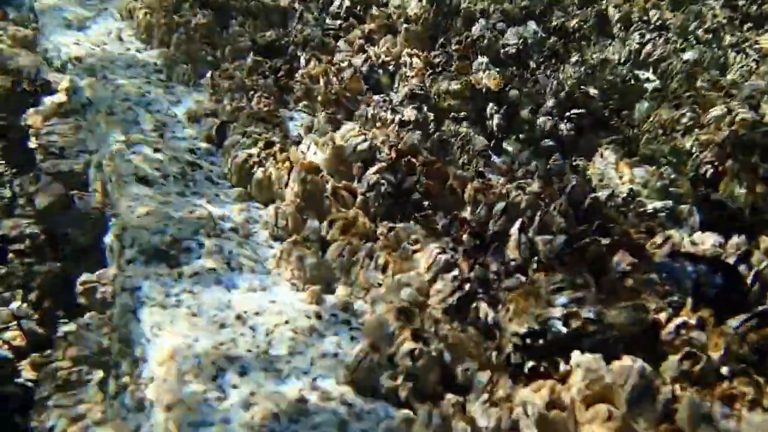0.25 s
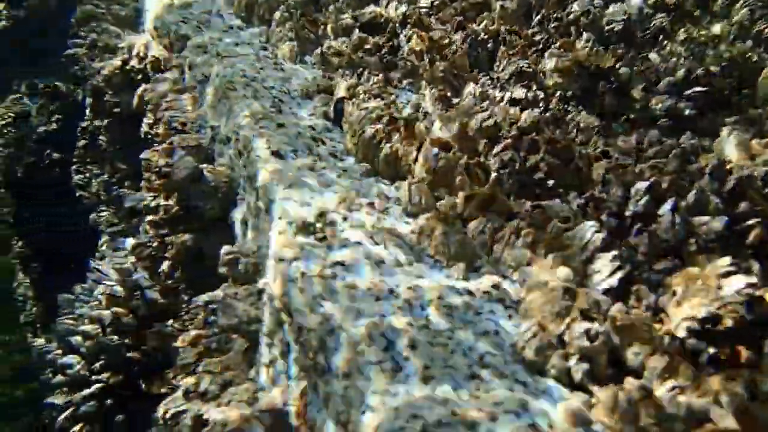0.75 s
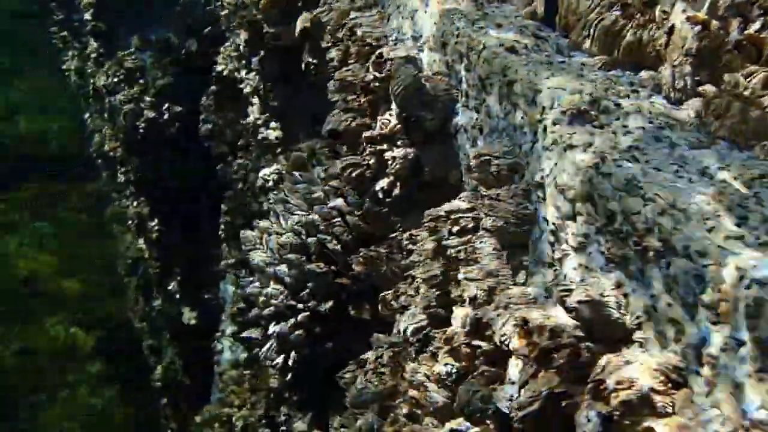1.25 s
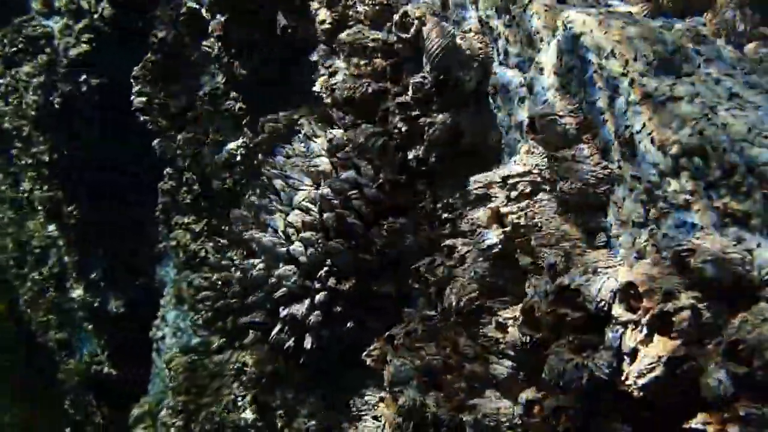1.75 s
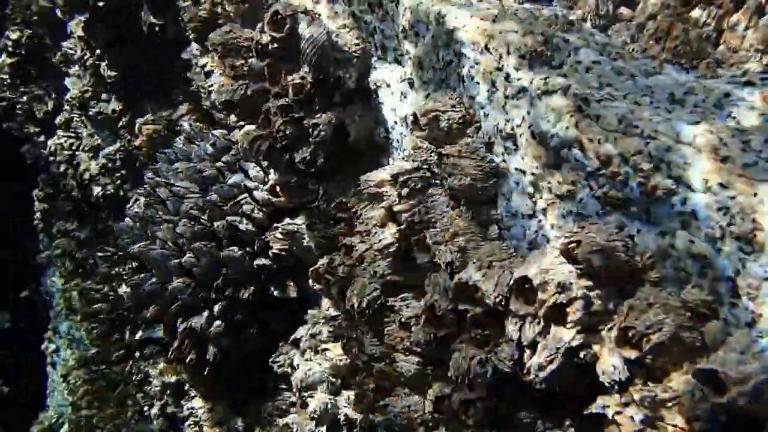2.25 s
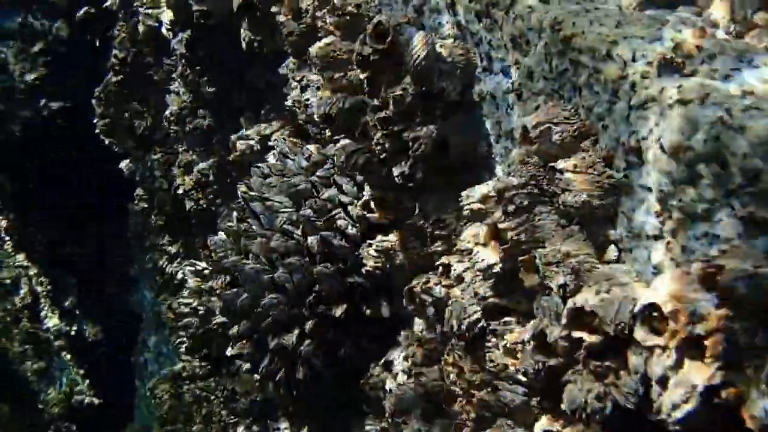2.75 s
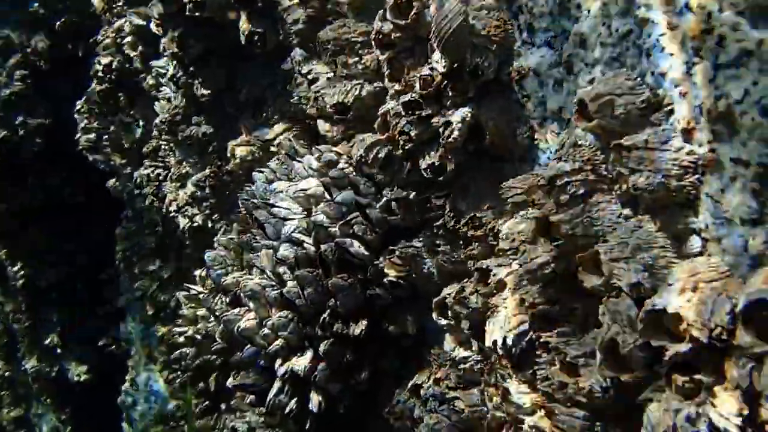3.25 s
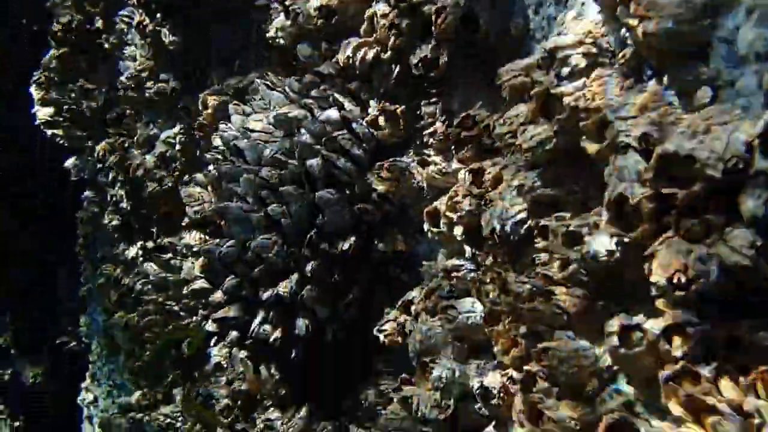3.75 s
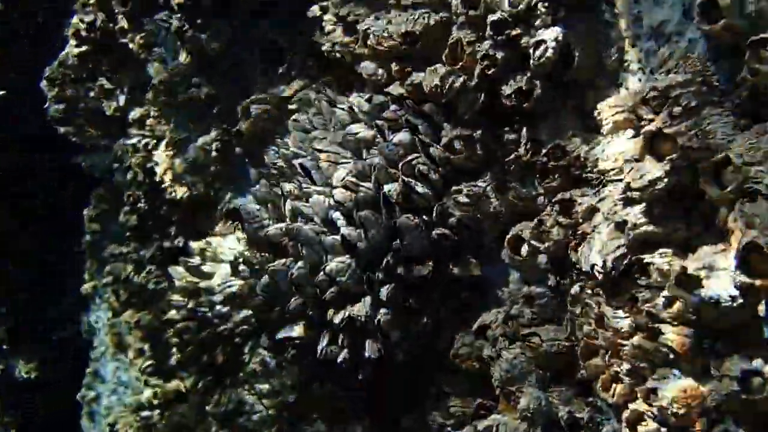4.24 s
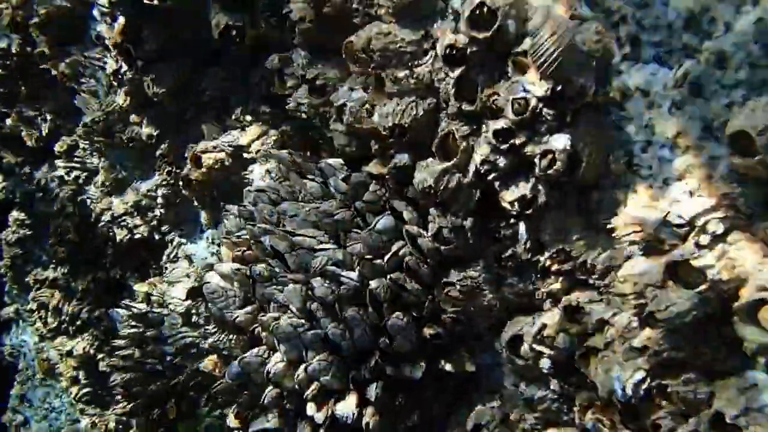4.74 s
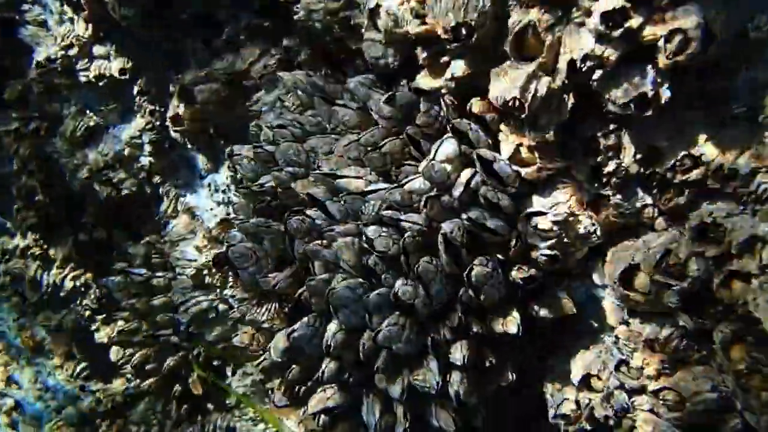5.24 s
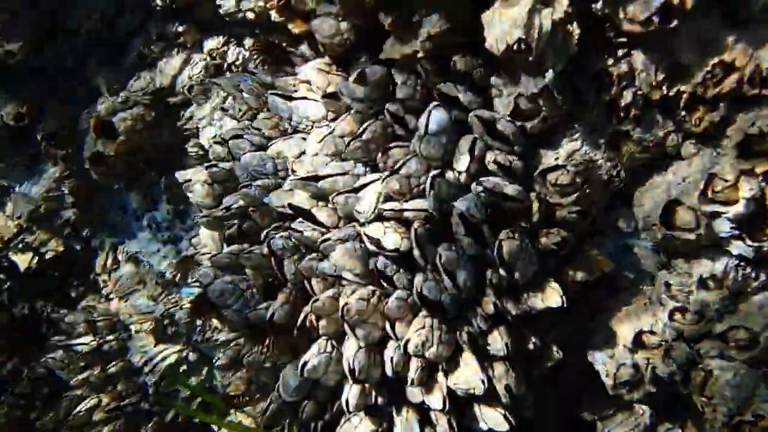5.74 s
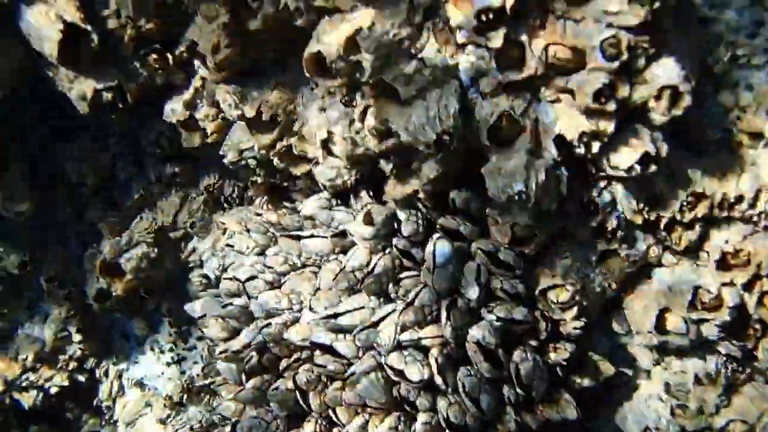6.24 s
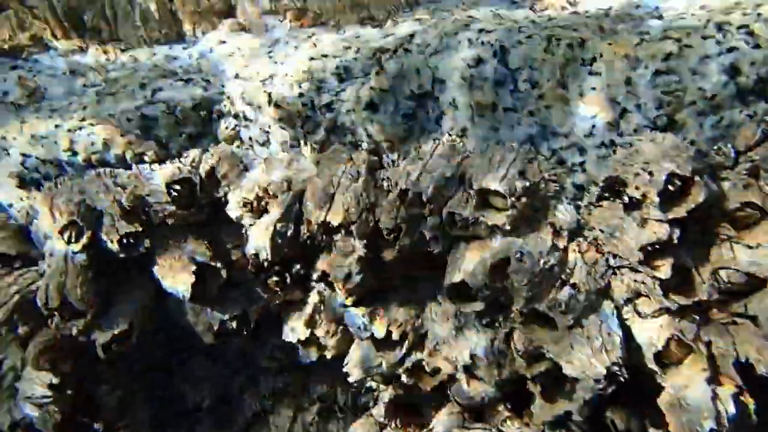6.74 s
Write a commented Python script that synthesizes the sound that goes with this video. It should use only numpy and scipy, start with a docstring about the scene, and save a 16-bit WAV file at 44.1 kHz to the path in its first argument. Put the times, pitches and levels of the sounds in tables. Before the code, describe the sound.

A submerged camera case ticks, pops and rubs softly, bumping hard once and then twice quickly, above steady hiss and low rumble.

```python
"""Under water, close over a barnacle-covered rock, a drifting camera bumps its housing hard three times.
Each impact excites the normal modes of the case; small taps, pops and stick-slip rubs keep it crackling.
Inside, the lens hunts for focus and the iris steps, their clicks dispersed by bending waves in the wall.
Hiss, a faint hum and a dull handling rumble lie beneath; the gain control ducks after each hard bump."""
import sys
import numpy as np
from scipy import signal
from scipy.fft import rfft, irfft, next_fast_len
from scipy.io import wavfile
from scipy.ndimage import map_coordinates

SR = 44100
rng = np.random.default_rng(int(sys.argv[2]) if len(sys.argv) > 2 else 0)


def pcm_store(signal):
    """Save signal as 16-bit PCM."""
    levels = np.round(np.clip(np.atleast_2d(signal), -1, 1) * 32767)
    wavfile.write(sys.argv[1], SR, levels.astype(np.int16).T)


N = 308259
T = np.arange(4096) / SR  # time axis of one click, in seconds
LENS_STEPS_PER_S = 15

# spectral envelopes of the noises and clicks: frequency_hz, relative_db
HISS_SPECTRUM = [(20, -21), (80, -12.5), (200, -6), (1000, -9), (2300, -16.5), (3100, -13.5), (3600, -17),
                 (4400, -17), (5600, -11), (6600, -12.5), (7650, -5), (8450, -9), (9200, -17.5),
                 (16000, -19.5)]
RUMBLE_SPECTRUM = [(20, -31), (60, -11), (180, -0.5), (450, -5), (700, -15), (1180, -4), (1500, -15),
                   (1950, -18.5), (2700, -20.5), (3150, -17.5), (3550, -41), (9000, -26)]
SCRAPE_SPECTRUM = [(60, -12.5), (200, -3), (450, 1.5), (680, -8), (950, 1.5), (1250, 1), (1700, -19.5),
                   (2150, -10.5), (2500, -34), (3050, -6), (4000, -23.5), (12000, -24)]
SQUEAK_SPECTRUM = [(1000, -22), (4000, -19.5), (6600, -14), (7550, 3), (8200, -5), (9300, -29),
                   (11500, -19), (16000, -34)]
IRIS_SPECTRUM = [(100, -30), (480, -2), (850, -2), (1170, 10.5), (1350, 6.5), (1650, -20), (2100, 2),
                 (2400, -21.5), (2950, -1.5), (3550, -12), (4150, -4), (5000, -16), (7500, -26),
                 (12000, -43)]
FOCUS_SPECTRUM = [(200, -11), (750, -34), (1220, 11), (1420, -10), (1560, 4), (1900, -5), (2450, -19),
                  (3080, -19), (3270, 7), (3500, -4.5), (4050, -7.5), (4330, 5), (4600, -5.5), (5200, -8.5),
                  (6300, -10.5), (10000, -41)]
# course of the sinking hum: time_s, pitch_hz, level_db
HUM_GLIDE = [(1.6, 230, -71.5), (2.3, 205, -51.5), (2.8, 185, -80), (4.5, 143.6, -64.5),
             (4.901, 140.6, -56), (5.7, 138.5, -71.5), (6.99, 130.2, -58.5)]
# narrow resonances of the case that sing throughout: pitch_hz, width_hz, level_db
CASE_RESONANCES = [(2265, 90, -68), (3088, 170, -62.5), (3306, 130, -69)]
# strength of the grip that drives the rumble: time_s, relative_db
GRIP_CURVE = [(0.0, -64), (0.29, -63.5), (0.7, -46.5), (0.91, -52), (2.39, -50), (2.59, -52), (3.62, -50.5),
              (4.13, -56.5), (5.49, -48), (6.19, -56.5), (6.83, -57.5), (6.99, -52)]
# spells in which the lens hunts back and forth: start_s, end_s
FOCUS_HUNTS = [(0.02, 0.255), (0.3038, 0.937)]
# steps of the iris: time_s, relative_db
IRIS_STEPS = [(1.28, -31), (1.949, -37.5), (2.35, -37), (2.543, -40), (2.683, -36.5), (2.949, -45.5),
              (3.285, -38), (3.552, -42), (4.224, -36), (4.62, -42.5), (5.09, -38), (5.488, -38),
              (5.824, -40.5), (6.084, -42)]
# soft pushes of the hand: start_s, pitch_hz, peak_db
HAND_PUSHES = [(0.723, 307, -35), (2.268, 198, -41), (3.896, 302, -31.5), (3.906, 228, -35.5),
               (3.988, 192, -34), (6.147, 221, -30)]
# rubs on the case, levels relative: start_s, end_s, scrape_db, squeak_db
CASE_RUBS = [(0.654, 0.713, -48.5, -68), (1.112, 1.168, -51, -68), (1.34, 1.413, -51, -47.5),
             (2.456, 2.512, -44, -45.5), (3.307, 3.442, -48, -57), (3.461, 3.507, -50.5, -46),
             (5.046, 5.105, -54, -46.5), (5.287, 5.365, -50, -53)]
# single slips: start_s, relative_db
SLIP_TICKS = [(1.348, -40), (1.384, -41.5), (4.465, -47.5), (4.815, -47), (5.099, -44), (5.927, -46.5)]
# normal modes of the housing: pitch_hz, relative_db, t60_s
HOUSING_MODES = [(124, -16.5, 0.056), (285, -6, 0.027), (363, -2, 0.025), (485, 1, 0.024), (700, -8, 0.031),
                 (852, 3, 0.023), (1099, 11, 0.026), (1350, -17, 0.037), (2120, -7.5, 0.0099),
                 (2790, -1, 0.011), (3066, -6.5, 0.02), (4260, 0.5, 0.011), (5340, -2, 0.0072),
                 (6040, 2, 0.0049), (7640, 4, 0.0088), (8750, -2, 0.0048), (11020, -16, 0.02)]
# bumps and clear taps, by low, middle and high band: start_s, thump_db, knock_db, crack_db
IMPACTS = [(0.334, -40.5, -44.5, -65), (0.483, -42.5, -49, -65), (0.538, -48, -43, -66),
           (0.58, -42.5, -50, -62), (0.803, -40.5, -55, -68), (0.884, -8.5, -7, -20.5),
           (0.9033, -38, -54, -36.5), (0.965, -33, -37, -48), (1.249, -46, -40, -56),
           (1.509, -42.5, -38, -32.5), (1.612, -10, -6.5, -12.5), (1.636, -15.5, -8, -11.5),
           (1.682, -43, -37, -43), (1.733, -37, -33, -30), (1.979, -43, -49.5, -60),
           (2.141, -42.5, -41.5, -60), (2.255, -39, -43.5, -53), (2.422, -46, -48.5, -60),
           (2.811, -57, -44.5, -68), (2.936, -47.5, -48, -58), (3.461, -62, -40.5, -50.5),
           (3.709, -33.5, -36, -66), (3.743, -42, -45, -68), (4.025, -41.5, -45, -69),
           (4.329, -42.5, -54, -75), (4.589, -42.5, -60, -75), (4.747, -51, -43, -66),
           (5.344, -37, -43, -56), (5.613, -62, -42, -59), (5.814, -60, -42.5, -62),
           (5.911, -47, -43.5, -53), (6.282, -66, -43.5, -66), (6.548, -52, -41, -68),
           (6.636, -42.5, -43.5, -74), (6.882, -59, -46.5, -65)]
# left microphone port relative to the right: frequency_hz, lag_rad, gain_db
PORT_RESPONSE = [(250, .03, -.2), (1000, .25, 2), (2200, .65, 3), (4200, 1.4, .6), (7500, 1.7, -1)]


def amp(db):
    """Decibels to amplitude ratio."""
    return 10 ** (np.asarray(db) / 20)


def unit(x):
    """Normalise to rms 1."""
    return x / np.sqrt(np.mean(x ** 2) + 1e-20)


def unit_click(x):
    """Normalise a transient to the energy of 10 ms at rms 1."""
    return x / np.sqrt(np.sum(x ** 2) / (SR / 100) + 1e-20)


def along(points, hz):
    """Interpolate (frequency_hz, value) points on a logarithmic axis."""
    f, v = np.transpose(points)
    return np.interp(np.log(hz + 1), np.log(f + 1), v)


def filtered(x, response):
    """Linear filtering: multiply the spectrum by a frequency response."""
    size = next_fast_len(N + SR // 2)
    return irfft(rfft(x, size) * response(np.fft.rfftfreq(size, 1 / SR)), size)[..., :N]


def wobble(rate_hz):
    """Slow modulation: a spline through random knots."""
    knots = rng.standard_normal(int(N * rate_hz / SR) + 4)
    return map_coordinates(knots, [np.arange(N) * rate_hz / SR])


def add(track, start_s, sound):
    """Superpose a sound on the track."""
    part = track[max(round(start_s * SR), 0):][:len(sound)]
    part += sound[:len(part)]


def narrowband(hz, width_hz):
    """Quadrature modulation: noise at rms 1 about a centre that may glide."""
    phase = 2 * np.pi * np.cumsum(hz * np.ones(N)) / SR
    return unit(wobble(width_hz) * np.cos(phase) + wobble(width_hz) * np.sin(phase))


def impulse(spectrum, travel_s=0):
    """Dispersion: bending waves carry the treble of a click faster; 1 kHz arrives after travel_s."""
    hz = np.fft.rfftfreq(len(T), 1 / SR)
    cepstrum = irfft(np.log(amp(along(spectrum, hz))))
    minimum_phase = np.exp(rfft(2 * cepstrum * (T < T[-1] / 2)))
    dispersion = np.exp(-4j * np.pi * travel_s * np.sqrt(1000 * hz))
    return unit_click(irfft(minimum_phase * dispersion))


def hiss(level_db=-51):
    """Self-noise: each microphone has its own steady, uncorrelated hiss."""
    white = rng.standard_normal((2, N))
    return amp(level_db) * unit(filtered(white, lambda hz: amp(along(HISS_SPECTRUM, hz))))


def hum(width_hz=30, flutter_db=1.0):
    """Narrowband noise is heard as wavering pitch: a low hum and the thin singing of the case."""
    time_s, pitch_hz, level_db = np.transpose(HUM_GLIDE)
    t = np.arange(N) / SR
    low = amp(np.interp(t, time_s, level_db)) * narrowband(np.interp(t, time_s, pitch_hz), width_hz)
    singing = sum(amp(db + flutter_db * wobble(15)) * narrowband(hz, width)
                  for hz, width, db in CASE_RESONANCES)
    return low + singing


def rumble(gain_db=-2.5, flutter_db=2.5, follow=0.62, crossover_hz=1600):
    """Forced vibration: water and hand stir the resonant case; the low band follows the grip."""
    grip_db = np.interp(np.arange(N) / SR, *np.transpose(GRIP_CURVE))
    stir_db = grip_db.mean() + follow * (grip_db - grip_db.mean())
    noise = unit(filtered(rng.standard_normal(N), lambda hz: amp(along(RUMBLE_SPECTRUM, hz))))
    low = filtered(noise, lambda hz: 1 / (1 + (hz / crossover_hz) ** 4))
    return amp(stir_db + gain_db + flutter_db * wobble(9.1)) * low + amp(-51) * (noise - low)


def focus_motor(pitch_hz=4810, level_db=-58.5, run_s=0.027, settled_s=1.343, mean_skipped_beats=1.4):
    """Tone bursts: once focus has settled, the motor whines on random beats of the lens clock."""
    out = np.zeros(N)
    n = round(run_s * SR)
    whine = unit(np.sin(2 * np.pi * pitch_hz * np.arange(n) / SR) * signal.windows.tukey(n, .3))
    waits = 1 + rng.poisson(mean_skipped_beats, size=50)
    for beat in np.cumsum(waits) - waits[0]:
        add(out, settled_s + beat / LENS_STEPS_PER_S, amp(level_db) * whine)
    return out


def pops(faint_db=-48.5, spread_db=3, centre_hz=600):
    """Damped oscillation: tiny round pops, each peaking after one cycle of its own pitch."""
    out = np.zeros(N)
    for when, size, pitch in rng.random((110, 3)):
        cycles = centre_hz * 2 ** (2 * pitch - 1) * T
        envelope = (cycles * np.exp(1 - cycles)) ** 2
        peak_db = faint_db - spread_db * np.log(size + 1 / 20)
        add(out, when * N / SR, amp(peak_db) * envelope * np.sin(2 * np.pi * cycles))
    return out


def thuds(swell_s=0.004):
    """Compliant contact: flesh on the case gives a few slow cycles that swell and die."""
    out = np.zeros(N)
    envelope = (T / swell_s * np.exp(1 - T / swell_s)) ** 2
    for start_s, pitch_hz, peak_db in HAND_PUSHES:
        add(out, start_s, amp(peak_db) * envelope * np.sin(2 * np.pi * pitch_hz * T))
    return out


def iris(gain_db=1.0, slack_db=-44, lead_s=0.0095):
    """Structure-borne sound: each step takes up its slack, then lands as a quick downward chirp."""
    out = np.zeros(N)
    click = impulse(IRIS_SPECTRUM, travel_s=0.0047)
    for time_s, db in IRIS_STEPS:
        add(out, time_s - lead_s, strike(slack_db - 9.5, slack_db, slack_db - 22))
        add(out, time_s - .0018, amp(db + gain_db) * click)
    return out


def focus_hunt(soft_db=-45.5, firm_db=-41.5, backlash_s=0.0124, scatter_db=1.0, jitter_s=0.0005):
    """Backlash: each clocked step of the lens ticks softly, crosses its slack, then ticks firmly."""
    out = np.zeros(N)
    tick = impulse(FOCUS_SPECTRUM, travel_s=0.0022)
    for start_s, end_s in FOCUS_HUNTS:
        for step_s in np.arange(start_s, end_s, 1 / LENS_STEPS_PER_S):
            for delay_s, db in (0, soft_db), (backlash_s, firm_db):
                late, size = rng.standard_normal(2)
                add(out, step_s + delay_s - .001 + jitter_s * late, amp(db + scatter_db * size) * tick)
    return out


def friction(spectrum, length_s, spiky):
    """Stick-slip friction: a short run of uneven slips excites a set of resonances."""
    n = max(round(length_s * SR), 64)
    noise = rng.standard_normal(n)
    slip_strength = np.exp(spiky * np.repeat(rng.standard_normal(n), 48)[:n])  # new about every 1 ms
    sound = signal.fftconvolve(noise * slip_strength * signal.windows.tukey(n, .5), impulse(spectrum))
    return sound / np.sqrt(np.sum(sound ** 2) / n)


def rubs(scrape_gain_db=4.0, squeak_gain_db=-2, tick_gain_db=4, tick_s=0.0047):
    """Friction scrapes in the low modes and squeaks in the stiff ones; one slip is a bright tick."""
    out = np.zeros(N)
    for start_s, end_s, scrape_db, squeak_db in CASE_RUBS:
        scrape = friction(SCRAPE_SPECTRUM, end_s - start_s, spiky=.7)
        squeak = friction(SQUEAK_SPECTRUM, end_s - start_s, spiky=.26)
        add(out, start_s, amp(scrape_db + scrape_gain_db) * scrape)
        add(out, start_s, amp(squeak_db + squeak_gain_db) * squeak)
    for start_s, db in SLIP_TICKS:
        add(out, start_s, amp(db + tick_gain_db) * friction(SQUEAK_SPECTRUM, tick_s, spiky=.3))
    return out


def strike(thump_db, knock_db, crack_db, rise_s=0.001, push_s=0.0018):
    """Modal superposition: a contact pushes the case, and three bands of modes ring with gritty chatter."""
    hz, mode_db, t60_s = np.transpose(HOUSING_MODES)[:, :, None]
    size, detune = rng.standard_normal((2, len(HOUSING_MODES), 1))
    # a hard bump wakes the whole case; a light touch catches the modes unevenly
    uneven = np.interp(knock_db, (-45, -15), (1, .2))
    envelopes = amp(mode_db + 9.3 * uneven * size - 60 * T / t60_s)
    modes = envelopes * np.sin(2 * np.pi * hz * (1 + 0.1 * uneven * detune) * T)
    modes[::2] *= -1  # neighbouring modes start in opposite directions
    out = amp(thump_db - 18) * unit_click(T * np.exp(-T / push_s))  # the push on the whole case
    attack = 1 - np.exp(-T / rise_s)
    bands = [(80, 620, thump_db, 0.036, 0.28), (620, 2300, knock_db, 0.036, 0.28),
             (2300, 11000, crack_db, 0.0065, 0.48)]
    for low_hz, high_hz, level_db, grit_t60_s, grit_share in bands:
        ring = modes[((hz > low_hz) & (hz <= high_hz))[:, 0]].sum(0)
        burst = rng.standard_normal(len(T)) * amp(-60 * T / grit_t60_s)
        grit = signal.sosfilt(signal.butter(3, (low_hz, high_hz), "band", fs=SR, output="sos"), burst)
        out += amp(level_db) * unit_click((unit(ring) + grit_share * unit(grit)) * attack)
    return out


def bumps(faint_db=-57, spread_db=5.5, softness_db=3):
    """Impact excitation: bumps and taps over a scatter of faint ones; softer contact favours the bass."""
    out = np.zeros(N)
    for start_s, *levels_db in IMPACTS:
        add(out, start_s, strike(*levels_db))
    for when, size, softness in rng.random((80, 3)):
        db = faint_db - spread_db * np.log(size + 1 / 20)  # few are strong
        tilt_db = softness_db * (2 * softness - 1)
        add(out, when * N / SR, strike(db + tilt_db, db - tilt_db, db - 9 - tilt_db))
    return out


def ports(x):
    """Phase and level cues: case sound reaches the left microphone a little later and mostly louder."""
    side = np.array([[1], [-1]]) / 2
    f, lag_rad, gain_db = np.transpose(PORT_RESPONSE)

    def response(hz):
        gain = amp(side * along(np.c_[f, gain_db], hz))
        return gain * np.exp(-1j * side * along(np.c_[f, lag_rad], hz))
    return filtered(x, response)


def scene():
    """Superposition: the sounds of the case pass through both ports and join the noise floor."""
    case = bumps() + pops() + iris() + focus_hunt() + rubs() + thuds() + focus_motor()
    return ports(case) + rumble() + hum() + hiss()


def record(dry, threshold_db=-4, deepest_db=7.5, attack_s=.0016, recover_db_per_s=55,
           low_cut_hz=40, top_hz=15900):
    """Automatic gain control: after a bass cut, peaks duck the gain; the rest is clipped and low-passed."""
    x = signal.sosfilt(signal.butter(2, low_cut_hz, "high", fs=SR, output="sos"), dry)
    peak_db = 20 * np.log10(np.abs(x).max(0) + 1e-9)
    over_db = np.clip(peak_db - threshold_db, 0, deepest_db)
    ramp_db = recover_db_per_s * np.arange(N) / SR
    held_db = np.maximum.accumulate(over_db + ramp_db) - ramp_db  # peak hold with steady release
    pole = np.exp(-1 / (attack_s * SR))
    duck_db = signal.lfilter([1 - pole], [1, -pole], held_db)
    clipped = np.clip(x * amp(-duck_db), -1, 1)
    return filtered(clipped, lambda hz: hz < top_hz)


dry = scene()
out = record(dry)
pcm_store(out)
```